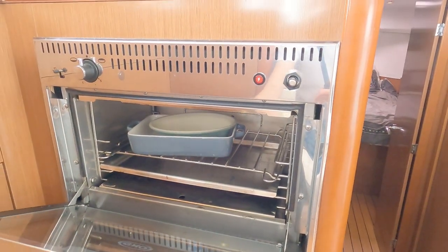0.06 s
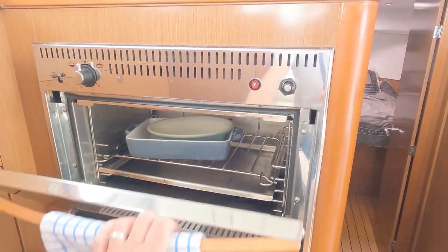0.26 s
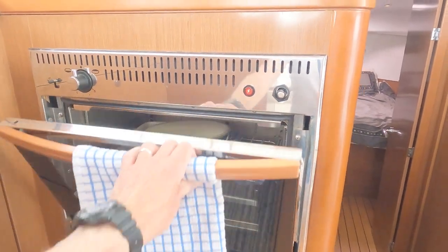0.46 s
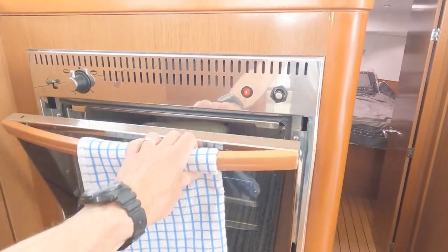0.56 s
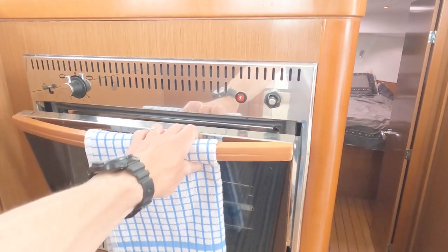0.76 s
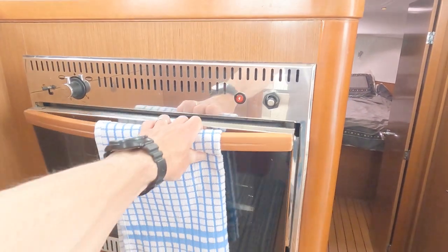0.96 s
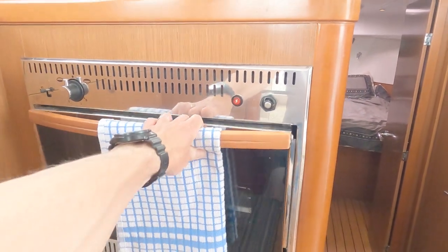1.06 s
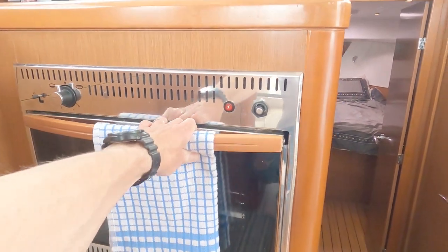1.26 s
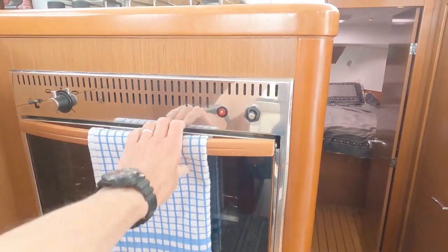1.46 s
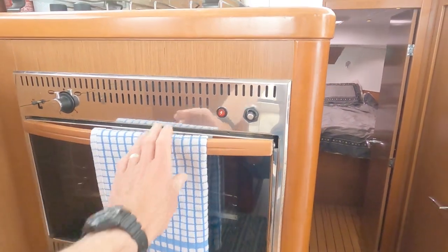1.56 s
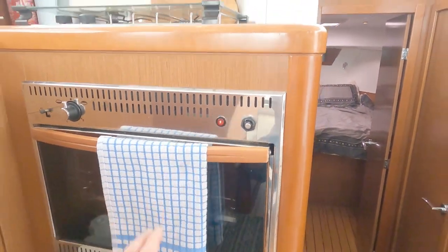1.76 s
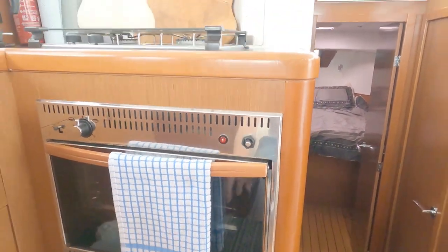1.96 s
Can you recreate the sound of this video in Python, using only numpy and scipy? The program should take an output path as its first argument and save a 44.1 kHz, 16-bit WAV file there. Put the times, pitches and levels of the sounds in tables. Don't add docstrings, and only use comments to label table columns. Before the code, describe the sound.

Closing oven door in a small boat galley, heard close: rising hinge scrape, clattering metal bang, quieter rubbing and small knocks, a quick latch chatter, then light towel rustle over low hull hum.

```python
import sys
import numpy as np
from scipy import signal
from scipy.fft import rfft, irfft
from scipy.io import wavfile
from scipy.ndimage import uniform_filter1d

SR = 44100
rng = np.random.default_rng(int(sys.argv[2]) if len(sys.argv) > 2 else 0)


def volts(x):
    e = np.asarray(x, float) / 20
    return 10 ** e


def dump_mix(stems):
    frames = np.atleast_2d(stems).T
    limited = np.clip(frames, -1, 1)
    pcm = np.round(limited * 32767).astype(np.int16)
    wavfile.write(sys.argv[1], SR, pcm)


N = 88200

# frequency in Hz, level in dB per Hz.
HUSH_SPECTRUM = [(26, -53), (45, -2), (80, -14), (162, -12), (304, -22), (458, -25), (838, -30),
                 (1390, -31), (14500, -74)]
# frequency in Hz, t60 in s.
CABIN_T60 = [(100, 0.69), (500, 0.098), (2000, 0.07), (8000, 0.041)]
# start in s,
# level in dB, frequency in Hz, t60 in s.
BOOMS = [(.25, -40.5, 110.6, 0.22), (.36, -55, 93.5, 0.25), (0.514, -30.5, 53.7, 0.28),
         (0.519, -29, 125, 0.49), (0.529, -30, 224.7, 0.225), (0.551, -31, 72.03, 0.67),
         (0.577, -31.5, 131, 0.69), (.66, -35.5, 55.6, 0.34), (.8, -36, 87, 0.4), (1.098, -39, 90.8, 0.39),
         (1.131, -50, 160, 0.77), (1.242, -43.5, 113.6, 0.26), (1.44, -40.5, 362, 0.27),
         (1.478, -44, 358, 0.13), (1.76, -48.5, 91.1, 0.96), (1.78, -48, 175, 0.13)]
# time in s, drag level in dB.
TOWEL_DRAG = [
    (1.22, -99),
    (1.29, -60.5),
    (1.34, -70),
    (1.43, -54),
    (1.55, -70),
    (1.7, -70),
    (1.78, -61),
    (1.88, -60.5),
    (1.96, -56),
]
# frequency in Hz, level in dB per Hz.
TOWEL_SPECTRUM = [(88, 4.5), (150, 7.5), (271, 1.5), (748, -14.5), (872, -25), (1410, -11), (4870, -16.5),
                  (14500, -30)]
# start in s, level in dB, centre in Hz, length in s.
TICKS = [
    (0.468, -37, 5800, 0.013),
    (.655, -56, 9800, .045),
    (1.109, -43, 4200, 0.014),
    (1.11, -49, 8500, 0.012),
    (1.382, -51, 5900, 0.0073),
    (1.769, -56, 5000, 0.006),
    (1.792, -56, 5500, 0.006),
]
# start in s, level in dB, length in s.
RATTLES = [
    (1.433, -46.5, 0.024),
    (1.443, -37.5, 0.02),
    (1.449, -41, 0.008),
    (1.455, -36.5, 0.016),
    (1.465, -42, 0.007),
    (1.48, -34.5, 0.007),
    (1.484, -34, 0.007),
    (1.491, -47, 0.03),
    (1.5, -56, .09),
]
# frequency in Hz, width in Hz, level in dB.
LATCH_PARTS = [(362, 25, -6), (1060, 90, -4), (1230, 110, -1), (1580, 140, -1), (2850, 500, -2)]
# frequency in Hz, level in dB per Hz.
CHATTER_SPECTRUM = [(150, -23), (250, -19), (450, -12.5), (864, -23), (1020, -12.5), (1570, -8),
                    (1790, -12), (7600, -28.5), (14500, -48)]
# time in s, drag level in dB.
SWING_DRAG = [
    (.03, -66.5),
    (.1, -48.5),
    (.17, -44.5),
    (.29, -38.5),
    (.38, -37.5),
    (.45, -39),
    (.49, -39),
    (.515, -40.5),
    (.535, -31.5),
    (.56, -41),
]
# time in s, drag level in dB.
PRESS_DRAG = [
    (.58, -41),
    (.65, -49),
    (.71, -43),
    (.78, -45.5),
    (.85, -50.5),
    (1.0, -51.5),
    (1.06, -47),
    (1.12, -51.5),
    (1.2, -63.5),
]
# time in s, drag level in dB.
SETTLE_DRAG = [
    (1.19, -61),
    (1.27, -61.5),
    (1.4, -63),
    (1.56, -79),
]
# time in s, drag level in dB.
WHINE_DRAG = [
    (.05, -103),
    (.15, -50.5),
    (.22, -50.5),
    (.35, -50),
    (.5, -55),
]
# frequency in Hz, level in dB per Hz.
SCRAPE_SPECTRUM = [(29, -46), (50, -18), (93, 3.5), (239, -9.5), (465, -7), (730, -10), (4030, -12.5),
                   (12000, -35.5), (14500, -46)]
RUB_SPECTRUM = [(110, -17), (190, 3), (422, -1.5), (782, -6.5), (1060, -8), (3340, -20.5), (4150, -18.5),
                (11000, -39), (14500, -56)]
SPRING_SPECTRUM = [(1500, -41), (2500, -21), (3500, 8.5), (4100, 10), (5000, 1.5), (8000, -17),
                   (14000, -68)]
# frequency in Hz, width in Hz, level in dB.
DOOR_SKIN = [(495.5, 55, 21.5), (1083, 220, 18.5), (1760, 36, 8), (2230, 16, -17), (2426, 27, 4.5),
             (2960, 15, -22), (3420, 34, -15), (4050, 23, -11), (4120, 43, -38.5), (4780, 30, -9.5)]
# start in s, level in dB, struck spot in Hz, contact in s, crack level in dB.
KNOCKS = [(.295, -30, 1100, .007, 0), (.44, -32, 470, .008, -9), (.468, -23, 580, .006, -8),
          (.516, -28, 1500, .011, 2), (.5285, -17, 940, .008, -1), (.5285, -21, 1800, .006, 2),
          (.535, -25, 716, .008, -9), (.533, -19, 490, .006, -7), (.533, -18, 1012, .01, -6),
          (.546, -27, 950, .008, -6), (.551, -33, 430, .014, -8), (.566, -33, 1100, .012, -4),
          (.682, -44, 400, .01, 0), (.70, -42, 500, .012, 0), (.726, -42, 430, .012, 0),
          (1.0705, -37.5, 510, .012, -1), (1.23, -40, 1080, .012, -11), (1.231, -46, 1600, .012, -12),
          (1.239, -45, 350, .008, -12), (1.282, -52, 1000, .008, -10), (1.354, -52, 1300, .01, -6),
          (1.382, -42, 1800, .009, -6), (1.793, -44, 230, .006, -14)]
# frequency in Hz, level in dB per Hz.
CRACK_SPECTRUM = [(120, -8), (200, 4), (490, -1), (753, -16), (1020, 2.5), (2290, -5.5), (3650, -7.5),
                  (10500, -33.5), (14500, -77)]
# frequency in Hz, level in dB, t60 in s.
SHIVER = [(417, -10, 0.15), (980, -14.5, 0.22), (1870, -27, 0.026), (4000, -14, 0.023)]
# frequency in Hz, gain in dB.
MIC_RESPONSE = [(10, 1.5), (5500, -1), (7600, 1), (8800, -4.5), (12700, -4), (13200, -10), (15000, -22)]


def evened(x):
    return x / np.sqrt(np.mean(x ** 2) + 1e-20)


def peaked(x):
    return x / abs(x).max()


def read(points, hz):
    f, value = np.transpose(points)
    return np.interp(np.log(hz + 1), np.log(f + 1), value)


def colour(x, points):
    hz = np.fft.rfftfreq(x.shape[-1], 1 / SR)
    low_cut = np.minimum(hz / points[0][0], 1) ** 3
    return evened(irfft(rfft(x) * volts(read(points, hz)) * low_cut, x.shape[-1]))


def resonate(x, hz, width_hz):
    return signal.lfilter(*signal.iirpeak(hz, hz / width_hz, SR), x)


def highpass(x, hz):
    return signal.lfilter(*signal.butter(1, hz, "high", fs=SR), x)


def slow_noise(size_a, size_b):
    return evened(uniform_filter1d(uniform_filter1d(rng.standard_normal(N), size=size_a), size=size_b))


def burst(start_s, length_s):
    u = (np.arange(N) / SR - start_s) / length_s
    grains = rng.standard_normal(N) * volts(2.96 * rng.standard_normal(N))
    return grains * np.clip(u * 5, 0, 1) * np.exp(-2.2 * np.clip(u, 0, 30))


def background():
    hum_hz, hum_width_hz, hum_db, hush_db = 31, 7, -46, -55
    noise = rng.standard_normal((4, N))
    hum = []
    for v in noise[:2]:
        v = evened(resonate(resonate(v, hum_hz, hum_width_hz), hum_hz, 2 * hum_width_hz))
        hum.append(evened(v / (abs(signal.hilbert(v)) + .1) ** .25))
    hush = colour(noise[2], HUSH_SPECTRUM)
    hush_side = highpass(colour(noise[3], HUSH_SPECTRUM), 600)
    lr = np.array([[1], [-1]])
    return volts(hum_db) * (hum[0] + 0.27 * lr * hum[1]) + volts(hush_db) * (hush + 0.81 * lr * hush_side)


def cabin(x):
    taps = np.zeros((2, SR // 2))
    slots = np.arange(100, SR // 2 - 20, 20)
    at = slots + rng.integers(0, 20, (2, (SR // 2 - 101) // 20))
    np.put_along_axis(taps, at, rng.choice([-1., 1.], at.shape), 1)
    hz, t, z = signal.stft(taps, SR, nperseg=256)
    decay = volts(-60 * t / read(CABIN_T60, hz)[:, None])
    tail = signal.istft(z * decay, SR, nperseg=256)[1]
    tail = highpass(tail, 700) / np.linalg.norm(tail[0])
    side = highpass(tail[1], 900)
    stereo = np.array([tail[0] + 1.36 * side, tail[0] - 1.03 * side])
    return signal.fftconvolve(x[None], stereo, axes=1)[:, :N]


def thuds():
    rise_s = 0.01
    t = np.arange(N) / SR
    out = np.zeros(N)
    for start_s, db, hz, t60_s in BOOMS:
        u = np.maximum(t - start_s, 0)
        waver = 1 + .025 * slow_noise(1500, 1500)
        swell = 1 - np.exp(-(u / rise_s) ** 2)
        out += volts(db - 60 * u / t60_s) * swell * np.sin(2 * np.pi * hz * np.cumsum(waver) / SR)
    return out


def ticks():
    out = np.zeros(N)
    for start_s, db, hz, length_s in TICKS:
        hiss = resonate(resonate(burst(start_s, length_s), hz, .8 * hz), hz, .8 * hz)
        out += volts(db) * peaked(hiss)
    return out


def latch():
    drive = sum(volts(db) * burst(start_s, length_s) for start_s, db, length_s in RATTLES)
    parts = np.zeros(N)
    for hz, width_hz, db in LATCH_PARTS:
        parts += volts(db + 11.0) * resonate(drive, hz, width_hz) * np.sqrt(100 / width_hz)
    return parts + volts(1.0) * np.std(drive) * colour(drive, CHATTER_SPECTRUM)


def drag(curve, spectrum, ring_db, flicker_db):
    slips_per_s, spread_db = 8000, 2.8
    struck = rng.random(N) < slips_per_s / SR
    force = volts(spread_db * np.minimum(rng.exponential(1, N), 4))
    slips = struck * rng.choice([-1., 1.], N) * force
    grit = colour(slips, spectrum)
    skin = np.zeros(N)
    for hz, width_hz, db in DOOR_SKIN:
        skin += volts(db) * resonate(slips, hz, width_hz) * np.sqrt(100 / width_hz)
    s, db = np.transpose(curve)
    t = np.arange(N) / SR
    level = volts(np.interp(t, s, db) + flicker_db * slow_noise(500, 300))
    ends = np.clip((t - s[0]) / 0.025, 0, 1) * np.clip((s[-1] + 0.05 - t) / 0.043, 0, 1)
    return evened(grit + volts(ring_db) * evened(skin)) * level * ends


def towel():
    return drag(TOWEL_DRAG, TOWEL_SPECTRUM, -15.5, 1)


def hinge():
    swing = drag(SWING_DRAG, SCRAPE_SPECTRUM, -7, 0.7)
    whine = drag(WHINE_DRAG, SPRING_SPECTRUM, -9, 0.41)
    press = drag(PRESS_DRAG, RUB_SPECTRUM, -6, 0.2)
    settle = drag(SETTLE_DRAG, RUB_SPECTRUM, -25, 0.85)
    return swing + whine + press + settle


def shiver(hits):
    out = np.zeros(N)
    for hz, db, t60_s in SHIVER:
        r = volts(-120 / (t60_s * SR))
        power = resonate(hits, hz, 0.99 * hz) ** 2
        stored = np.sqrt(abs(signal.lfilter([1 - r], [1, -r], power)))
        modes = resonate(resonate(rng.standard_normal(N), hz, 0.92 * hz), hz, 0.58 * hz)
        out += volts(db + 5.5) * stored * evened(modes)
    return out


def knocks():
    hits, t = np.zeros(N), np.arange(N) / SR
    for start_s, db, hz, contact_s, crack_db in KNOCKS:
        hit = burst(start_s, contact_s)
        u = np.maximum(t - start_s, 0)
        tone = u / contact_s * np.exp(-2.5 * u / contact_s) * np.sin(2 * np.pi * hz * u)
        spot = resonate(resonate(hit, hz, .5 * hz), hz, hz)
        crack = volts(crack_db) * peaked(colour(hit, CRACK_SPECTRUM))
        hits += volts(db) * (.6 * peaked(spot) + min(.55, 600 / hz) * peaked(tone) + crack)
    return hits + shiver(hits)


def scene():
    wet_db = -9
    door = hinge() + knocks()
    hand = towel() + latch() + ticks()
    near = door * volts(np.array([[.3], [-.3]])) + hand * volts(np.array([[.9], [-.9]]))
    return near + volts(wet_db) * cabin(door + hand) + thuds() + background()


def roll_off(x):
    return signal.sosfilt(signal.butter(12, 14670, fs=SR, output="sos"), x)


def record(dry):
    ports = np.array([dry[0], signal.lfilter([.85, .15], [1], dry[1])])
    hiss = np.diff(rng.standard_normal((2, N + 1)))
    ports = ports + volts(-91) * hiss + volts(-87) * resonate(hiss, 12400, 1000)
    response = volts(read(MIC_RESPONSE, np.fft.rfftfreq(N, 1 / SR)))
    return roll_off(irfft(rfft(ports) * response, N))


dry = scene()
out = record(dry)
dump_mix(out)
```